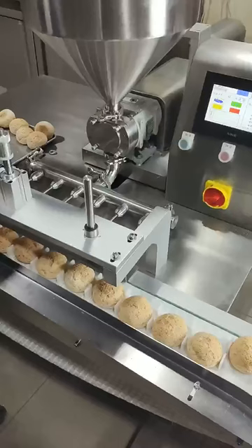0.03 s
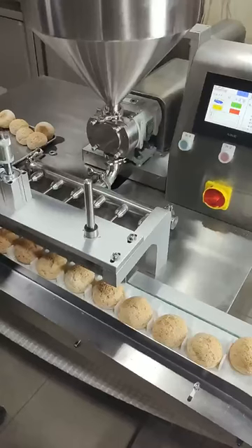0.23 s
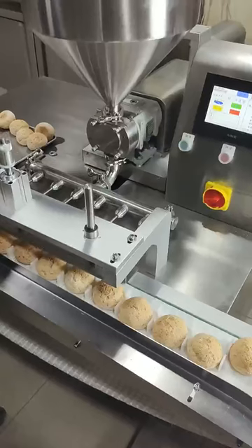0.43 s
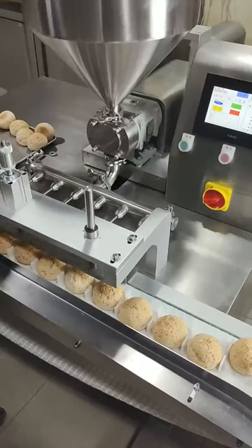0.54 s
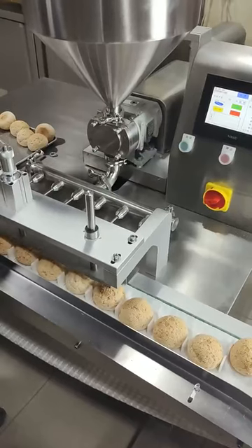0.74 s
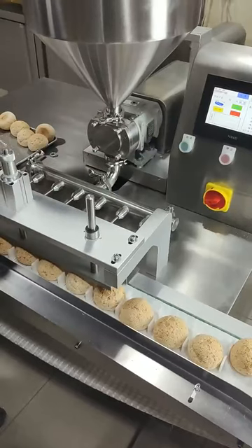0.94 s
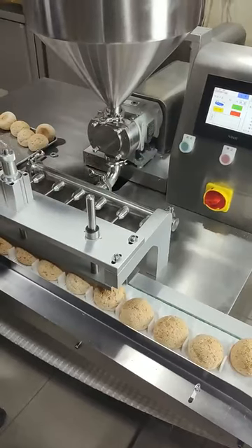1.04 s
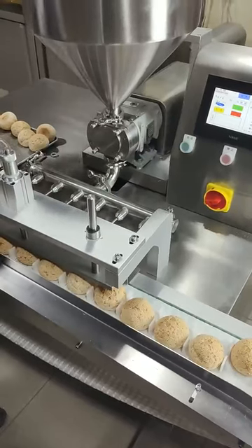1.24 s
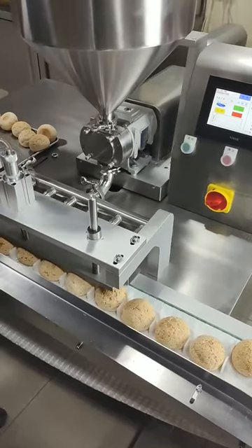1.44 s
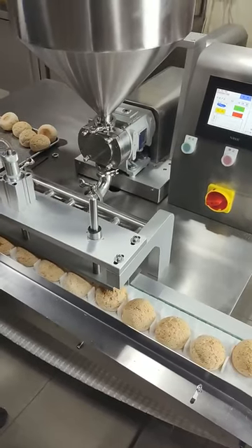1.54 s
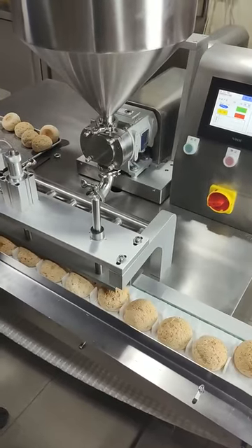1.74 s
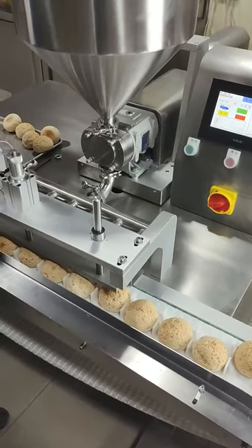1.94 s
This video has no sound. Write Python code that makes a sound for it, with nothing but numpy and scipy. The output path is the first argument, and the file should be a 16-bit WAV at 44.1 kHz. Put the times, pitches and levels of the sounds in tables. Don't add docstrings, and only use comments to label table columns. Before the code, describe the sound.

Compressed-air hisses and metallic clunks from a food filling machine, with a thin electric whine

```python
import sys
import numpy as np
from scipy import signal
from scipy.fft import rfft, irfft
from scipy.io import wavfile
from scipy.ndimage import uniform_filter1d, map_coordinates

SR = 44100
rng = np.random.default_rng(int(sys.argv[2]) if len(sys.argv) > 2 else 0)


def bounce(signal):
    frames = np.transpose(np.atleast_2d(signal))
    limited = np.clip(frames, -1, 1)
    pcm = np.round(limited * 32767).astype(np.int16)
    wavfile.write(sys.argv[1], SR, pcm)


def gain_from_db(level_db):
    decades = np.asarray(level_db, float) / 20
    return 10 ** decades


N = 88200


def along(points, hz):
    f, v = np.transpose(points)
    return np.interp(np.log(hz + 1), np.log(f + 1), v)


def curve(rows, t):
    s, db = np.transpose(rows)
    return np.interp(t, np.r_[s[0] - 0.006, s, s[-1] + 0.03], np.r_[-130, db, -130])


def wobble(rate):
    knots = rng.standard_normal(int(N * rate / SR) + 4)
    return map_coordinates(knots, [np.arange(N) * rate / SR])


def rush(spectrum, level, peaks=(), darken=0, low_pan_db=0, high_pan_db=0, bare_db=0, patchy_db=2):
    # frequency in Hz, likeness from 0 to 1.
    alike = [(60, .99), (130, .9), (250, .75), (500, .62), (1000, .15), (8000, .1)]
    ripple_db, ripple_hz = 4.5, 45
    bare_dies_first = 0.5
    hz = np.fft.rfftfreq(N, 1 / SR)

    bumps = np.minimum(map_coordinates(rng.standard_normal(2000), [hz / ripple_hz]), 1)
    ripple = gain_from_db(ripple_db * (hz > 500) * bumps)
    bare = (ripple * gain_from_db(along(spectrum, hz) + bare_db)) ** 2
    ring = np.zeros(len(hz))
    for centre, width, db in peaks:
        ring += gain_from_db(db) ** 2 / (1 + (2 * (hz - centre) / width) ** 2) ** 2

    turn = np.arccos(np.clip(along(alike, hz), 0, 1)) / 2
    noise = rfft(rng.standard_normal((2, 2, N))) * np.sqrt([bare, ring] / np.mean(bare + ring))
    side, mid = noise * np.array([np.sin(turn), np.cos(turn)])[:, None]
    pan = gain_from_db(along([(300, low_pan_db), (9000, high_pan_db)], hz) / 2)
    stereo = irfft([(mid + side) * pan, (mid - side) / pan], N)
    f, t, z = signal.stft(stereo, SR, nperseg=256)

    field = uniform_filter1d(rng.standard_normal(z.shape[2:]), size=3, axis=0)
    field = uniform_filter1d(field, size=8, axis=1)
    patches = patchy_db * field / field.std()

    loudest_s = max(level, key=lambda row: row[1])[0]
    fallen = np.clip(np.max(level, axis=0)[1] - curve(level, t), 0, 30)
    fallen = fallen * (len(peaks) > 0) * (t > loudest_s)
    treble_loss = darken * fallen * np.log2((f[:, None] + 200) / 1500)
    z = z[:, 0] * gain_from_db(-bare_dies_first * fallen) + z[:, 1]
    z = z * gain_from_db(patches - treble_loss)
    return signal.istft(z, SR, nperseg=256)[1][:, :N] * gain_from_db(curve(level, np.arange(N) / SR))


def room_noise():
    # frequency in Hz, level in dB per Hz.
    colour = [(60, -14), (256, -4), (900, -13), (4100, -12), (9600, -21), (10100, -60), (13000, -60),
              (14000, -24)]
    # time in seconds, level in dB.
    level = [(0.146, -63), (.5, -64.5), (.9, -64.5), (1.03, -65), (1.7, -57.5), (1.95, -73), (2, -71.5)]
    return rush(colour, level, high_pan_db=-5.5, patchy_db=0.8)


def air():
    # frequency in Hz, level in dB per Hz.
    first_colour = [(100, -51), (700, -4), (1100, -5.5), (2500, -8.5), (9800, -9.5), (10800, -55),
                    (12000, -57), (14500, -30)]
    stroke_colour = [(150, -10), (900, -6.5), (1550, -19), (2400, -12), (8000, -31), (10500, -28),
                     (11500, -65), (15000, -42)]
    short_colour = [(300, -19), (1500, -16.5), (6500, -31), (7300, -31), (10000, -26.5), (12500, -39),
                    (15000, -37)]
    blast_colour = [(100, -13), (800, -0.5), (1230, -10), (2720, -9), (9500, -11.5), (11000, -14.5),
                    (15000, -20.5)]
    hiss_colour = [(500, -64), (1400, -1.5), (2100, -5), (5800, -5.5), (8500, -18.5), (11300, -34),
                   (13500, -23.5), (15500, -29)]
    frame_colour = [(300, -37), (500, 8.5), (800, 2.5), (1100, -5), (1500, -53.5)]
    # time in seconds, level in dB.
    first_flow = [(.15, -61), (0.199, -47), (.27, -41.5), (.38, -45), (.43, -50), (0.518, -58), (.6, -60.5)]
    stroke_flow = [(0.653, -44.5), (.69, -44.5), (0.723, -45), (.77, -48.5), (.85, -58), (0.921, -66)]
    short_flow = [(1.043, -47.5), (1.07, -48), (1.1, -51.5), (1.137, -56.5)]
    blast_flow = [(1.138, -48), (1.147, -42), (1.151, -36.5), (1.24, -37.5), (1.32, -39), (1.42, -43.5),
                  (1.6, -46), (1.8, -74)]
    hiss_flow = [(1.201, -46.5), (1.35, -44.5), (1.561, -44), (1.758, -47.5), (1.82, -58), (1.89, -80)]
    frame_flow = [(0.198, -58), (.27, -53.5), (.34, -48), (.42, -51.5), (.5, -59.5), (.58, -67), (.62, -72)]
    # frequency in Hz, width in Hz, level in dB.
    first_ring = [(1430, 35, -3), (1550, 40, -6), (1750, 30, -2), (2200, 60, -5), (2355, 28, -5),
                  (2790, 45, -1), (2960, 30, -3), (3125, 28, -3), (3455, 35, -1), (3660, 45, -5),
                  (3945, 35, -2), (4140, 30, -6), (4315, 30, -4), (5210, 30, -5)]
    stroke_ring = [(1230, 300, 0), (1850, 310, -5), (2360, 410, -4), (3150, 120, -26)]
    short_ring = [(887, 70, 5.5), (1110, 130, 0), (2330, 480, 1), (3800, 190, -0.5), (4760, 960, -2.5),
                  (6400, 300, -0.5)]
    blast_ring = [(577, 29, -2), (670, 39, -2), (723, 49, 1.5), (800, 49, -3.5), (885, 83, -1),
                  (1626, 34, -5), (2755, 66, -4.5), (3974, 90, -3), (4300, 120, -4.5), (5910, 57, -8)]
    hiss_ring = [(1420, 90, -5), (1670, 80, 2), (2865, 70, 2), (3335, 70, -5), (4440, 190, 2),
                 (5150, 200, -2), (5540, 70, -1), (5980, 150, -1), (6340, 50, -4)]
    frame_ring = [(603, 28, -2), (690, 36, 11), (755, 38, 8.5)]
    # treble loss in dB per octave for each dB of fading, left minus
    # right in dB for the bass, the same for the treble, boost of the bare air in dB.
    shapes = [
        (0.3281, 10.5, -8, -6),
        (0.2621, 2, -3.5, 1.5),
        (0.16, 8, -10, 9),
        (0.2469, 2, -6.5, -2),
        (-0.1946, 16.5, -10, -0.5),
        (0.0648, 0, -12, -2),
    ]
    flows = [(first_colour, first_flow, first_ring), (stroke_colour, stroke_flow, stroke_ring),
             (short_colour, short_flow, short_ring), (blast_colour, blast_flow, blast_ring),
             (hiss_colour, hiss_flow, hiss_ring), (frame_colour, frame_flow, frame_ring)]
    out = np.zeros((2, N))
    for (colour, flow, ringing), shape in zip(flows, shapes):
        flutter = gain_from_db(0.15 * wobble(45))
        out += rush(colour, flow, ringing, *shape, patchy_db=0.7) * flutter
    return out


def rumble():
    # frequency in Hz, level in dB per Hz.
    colour = [(50, -4), (90, -7), (240, 3), (350, -1), (450, -12.5), (1100, -25), (2000, -120)]
    # time in seconds, level in dB.
    shaking = [(.15, -58.5), (0.348, -47), (.52, -52.5), (.6, -66), (0.721, -51.5), (.85, -55.5),
               (1.02, -67.5), (1.09, -54), (1.25, -47), (1.57, -50.5), (1.8, -64), (1.96, -76)]
    return rush(colour, shaking, patchy_db=1.5)


def short_tones():
    # start in seconds, length in seconds, frequency in Hz, level in dB.
    whistles = [(.42, .18, 735, -60), (.56, .04, 4900, -71), (.86, .06, 5400, -74), (.93, .07, 4130, -67),
                (.99, .06, 4880, -70), (.15, .09, 1430, -58), (.16, .07, 2780, -60), (.31, .14, 2960, -59),
                (.33, .14, 3130, -63), (.33, .07, 5210, -61), (1.72, .32, 245, -66), (1.6, .25, 700, -63),
                (1.065, .06, 2400, -58), (.36, .13, 3450, -61), (.39, .15, 2800, -60), (.4, .11, 1500, -61),
                (1.64, .2, 2865, -59), (1.4, .3, 1665, -59)]
    shake_db = 4
    wander = 22 / 3000
    t, out = np.arange(N) / SR, np.zeros((2, N))
    for s, length, hz, db in whistles:
        loudness = gain_from_db(db + shake_db * np.array([wobble(40), wobble(39.84)]))
        swell = np.sin(np.pi * np.clip((t - s) / length, 0, 1))
        cycles = np.cumsum(hz * (1 + wander * wobble(35))) / SR
        out += loudness * swell * np.sin(2 * np.pi * cycles + [[0], [0.6]])
    return out


def stops():
    # start in seconds, peak level in dB, frequency in Hz, length in cycles.
    thumps = [
        (0.154, -43.5, 220, 2.5),
        (.337, -32.5, 288, 1.28),
        (0.352, -28.5, 266, 0.4),
        (0.375, -40, 107, 1),
        (0.399, -38, 295, 0.5),
        (0.709, -54, 330, 6.5),
        (1.081, -42, 273, 3.3),
        (1.148, -25.5, 175, 1.45),
        (1.155, -40.5, 94.5, 4.8),
    ]
    t, out = np.arange(N) / SR, np.zeros(N)
    for s, db, hz, length in thumps:
        cycles = np.clip(t - s, 0, None) * hz
        swell = np.sin(np.pi * np.clip(cycles / length, 0, 1)) ** 2
        out += gain_from_db(db) * swell * np.sin(2 * np.pi * (cycles + 0.2))
    return out


def treble_fizz():
    # frequency in Hz, level in dB per Hz.
    colour = [(8000, 6), (9800, 11), (15000, -1)]
    # time in seconds, level in dB.
    level = [(0.157, -55), (.21, -46.5), (.3, -83), (.36, -100), (1.13, -100), (1.155, -36.5), (1.3, -58),
             (1.4, -74), (1.7, -91), (1.85, -82.5), (2, -72.5)]
    return rush(colour, level, high_pan_db=-6)


def drive_whine():
    # time in seconds, level in dB.
    level = [(.17, -70), (.26, -60), (.37, -52), (.56, -51), (1.035, -58), (1.06, -62), (1.14, -59),
             (1.3, -57), (1.4, -65), (1.72, -66), (1.83, -77), (2, -79)]
    whine_hz, shake_db = 9000, 0.3
    t = np.arange(N) / SR
    loudness = gain_from_db(curve(level, t) + 3.5 + shake_db * wobble(25.1))
    tone = np.sin(2 * np.pi * whine_hz * t + [[2.6], [0]])
    return loudness * tone * gain_from_db([[-6.5], [7]])


def motor_hum():
    # time in seconds, level in dB.
    level = [(.44, -81), (.5, -61.5), (.6, -65.5), (.85, -59), (.9, -67), (.95, -76), (1.05, -80),
             (1.13, -57), (1.2, -76)]
    hum_hz, wander_hz = 84, 2.5
    cycles = np.cumsum(hum_hz + wander_hz * wobble(8.57)) / SR
    return gain_from_db(curve(level, np.arange(N) / SR) + 5) * np.sin(2 * np.pi * cycles)


def valves():
    # start in seconds, peak level in dB, left minus right in dB.
    clicks = [
        (0.65, -24, -2.5),
        (1.041, -33.5, -10),
    ]
    # frequency in Hz, level in dB, time to fall 60 dB in seconds.
    large_body = [(710, -5.5, 0.023), (1144, -1.5, 0.029), (1330, -14, 0.018), (3020, -11.5, 0.052),
                  (4580, -2, 0.0064)]
    small_body = [(2450, 4, .025), (4400, 0, .018), (4800, 1, .018), (6600, -3, .025)]
    crack_gain, crack_t60 = 1.4, 0.03
    out, t = np.zeros((2, N)), np.arange(4000) / SR
    for (s, db, pan_db), body in zip(clicks, [large_body, small_body]):
        ring = np.zeros((2, len(t)))
        for hz, mode_db, t60 in body:
            start = rng.random() + 0.24 * rng.random((2, 1))
            drift = 0.022 * np.cumsum(rng.standard_normal((2, len(t))), axis=1)
            ring += gain_from_db(mode_db - 60 * t / t60) * np.sin(2 * np.pi * (hz * t + start + drift))
        dull = uniform_filter1d(uniform_filter1d(rng.standard_normal((2, len(t))), size=4), size=3)
        crack = crack_gain * gain_from_db(-60 * t / crack_t60) * dull
        click = (ring + crack) * (1 - np.exp(-t / 0.0003))
        pan = gain_from_db([[pan_db / 2], [-pan_db / 2]])
        out[:, round(s * SR):][:, :len(t)] += gain_from_db(db - 8) * pan * click
    return out


def room(x):
    # frequency in Hz, time to fall 60 dB in seconds.
    walls = [(200, 0.12), (10000, 0.61)]
    hz, t, z = signal.stft(rng.standard_normal((2, SR // 3)), SR, nperseg=256)
    decay = gain_from_db(-60 * t / along(walls, hz)[:, None])
    tail = signal.istft(z * decay, SR, nperseg=256)[1]
    delayed = np.pad(x, (300, 0))[None]
    return signal.fftconvolve(delayed, tail / np.linalg.norm(tail[0]), axes=1)[:, :N]


def chatter():
    # start in seconds, peak level in dB, frequency in Hz.
    taps = [
        (.681, -34, 1170),
        (.703, -34.5, 1240),
        (.722, -37, 2160),
        (.728, -41.5, 800),
        (.74, -46, 2390),
        (.758, -44, 2300),
        (.826, -48, 2250),
        (.88, -59, 1210),
    ]
    t60, grit_gain = 0.022, 0.27
    out, t = np.zeros((2, N)), np.arange(2000) / SR
    for s, db, hz in taps:
        grit = grit_gain * uniform_filter1d(rng.standard_normal((2, len(t))), size=6)
        tap = np.sin(2 * np.pi * (hz * t + 0.15 * rng.random((2, 1)))) + grit
        shape = gain_from_db(db - 60 * t / t60) * (1 - np.exp(-t / 0.001))
        out[:, round(s * SR):][:, :len(t)] += shape * tap
    return out


def scene():
    clicks = valves()
    echo = gain_from_db(-12.5) * room(clicks.mean(axis=0))
    flowing = air() + short_tones() + treble_fizz()
    knocks = clicks + echo + chatter() + stops()
    return flowing + knocks + drive_whine() + motor_hum() + room_noise() + rumble()


def low_pass(x):
    return signal.sosfilt(signal.butter(12, 16020, fs=SR, output="sos"), x)


def record(dry):
    open_s, rise_s, closed_db = 0.17, 0.048, -35
    mic_low_hz, top_hz = 68, 15750
    t, hz = np.arange(N) / SR, np.fft.rfftfreq(N, 1 / SR)
    gate = gain_from_db(closed_db * np.clip((open_s - t) / rise_s, 0, 1))
    gate = gate * (t > open_s - 1.4 * rise_s)
    low_cut = 0.0063 + hz ** 8 / (hz ** 8 + mic_low_hz ** 8)
    heard = irfft(rfft(dry) * (hz < top_hz) * low_cut, N)
    return low_pass(heard * gate)


dry = scene()
out = record(dry)
bounce(out)
```